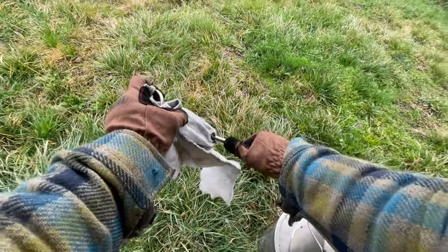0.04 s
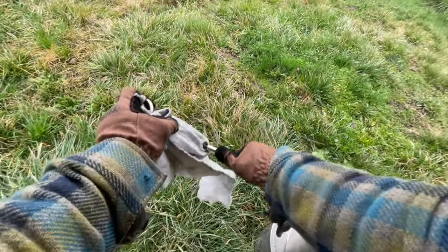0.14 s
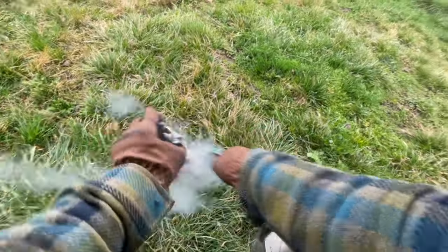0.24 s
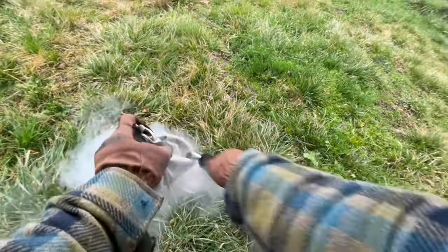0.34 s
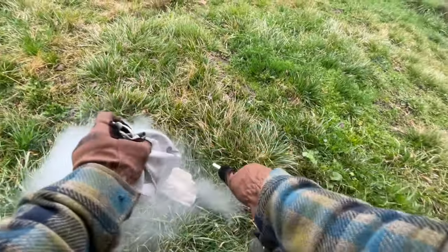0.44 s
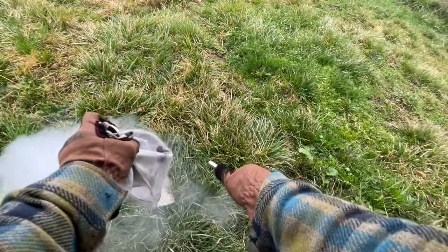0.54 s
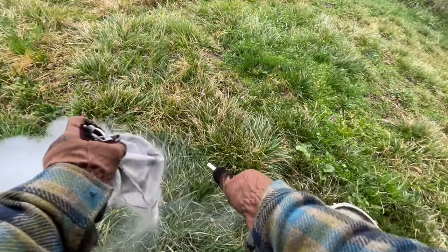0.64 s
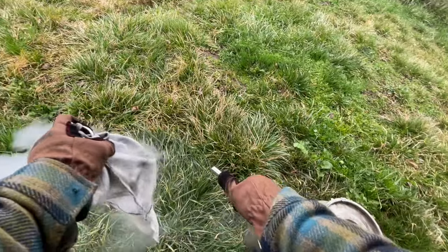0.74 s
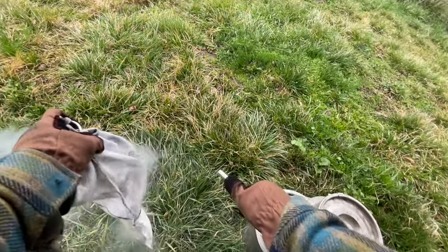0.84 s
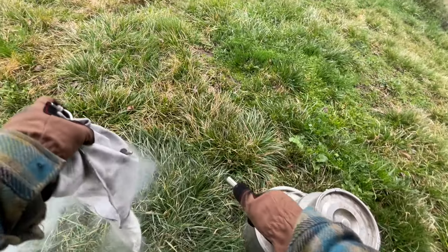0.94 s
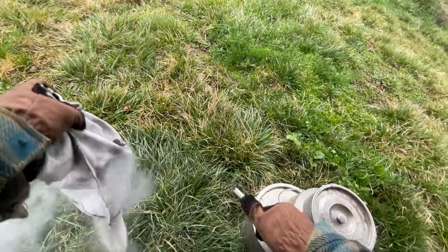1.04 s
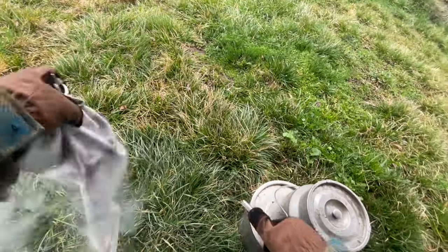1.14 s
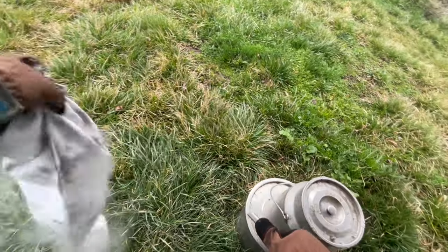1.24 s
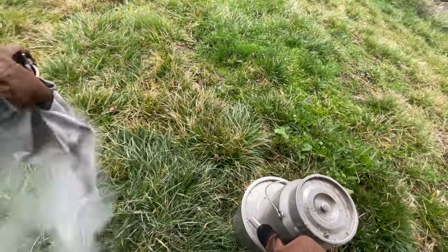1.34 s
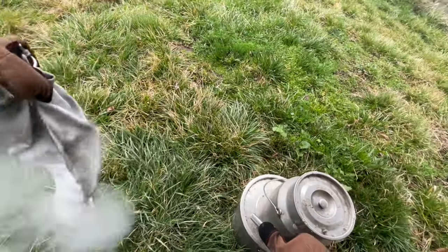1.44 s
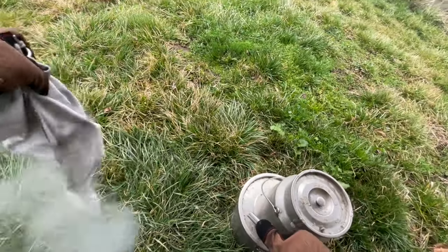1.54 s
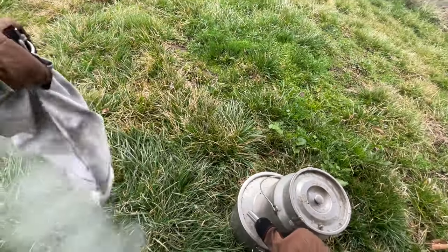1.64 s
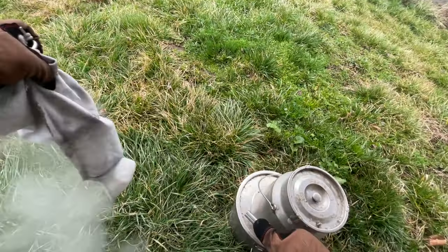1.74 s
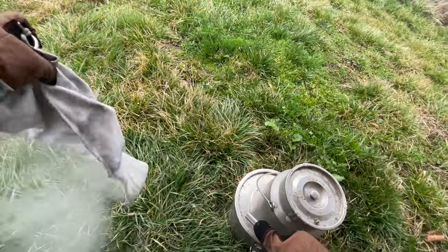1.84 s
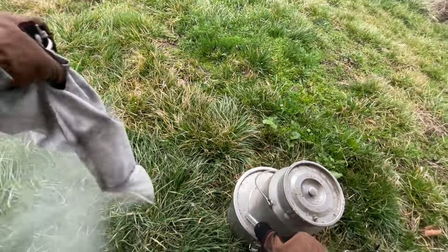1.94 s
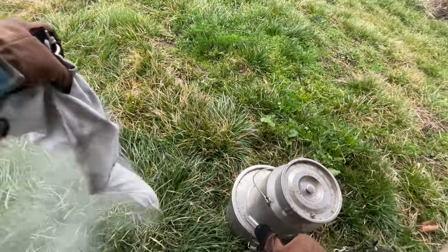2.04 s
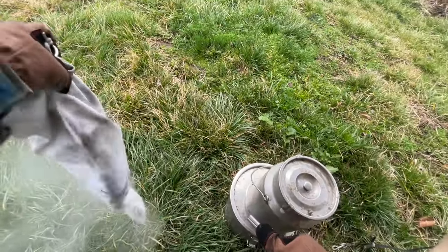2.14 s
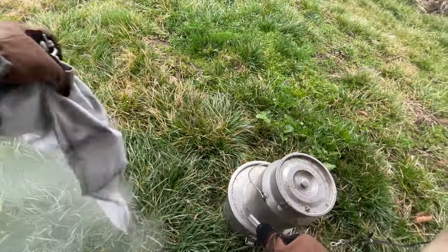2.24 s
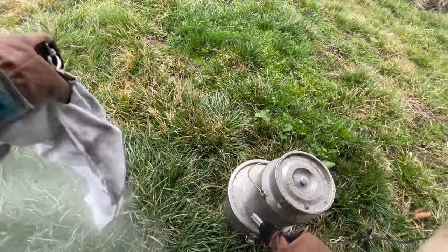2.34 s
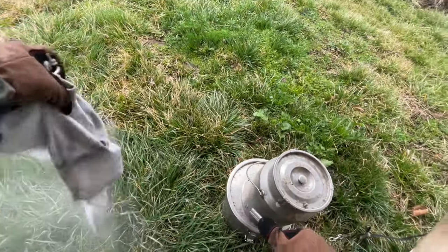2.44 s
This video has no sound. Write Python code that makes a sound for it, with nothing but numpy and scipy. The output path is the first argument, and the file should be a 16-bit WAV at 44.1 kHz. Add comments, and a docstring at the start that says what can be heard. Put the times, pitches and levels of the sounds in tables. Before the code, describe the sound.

A hard, explosive bang from a small iron pressure vessel at about 0.22 seconds, preceded by a split-second metal lid rasp, with a plunging puff, short outdoor tail and low throb fading by 0.8. Faint clacks surround it; a dull double knock lands at 0.75. From 1.15, soft cloth flaps, jingles and clacks grow busier over gentle steam, with low microphone gusts from 2.03 to 2.4.

```python
"""Iron pressure vessel fired into a sack

Outdoors, a small iron vessel is levered open: lid modes rasp for 20 ms, then a noise crack and a
falling sine make the bang and puff, with a short noise tail and a low throb that dies away.
Steam is soft coloured noise. The cloth sack flaps, slides and crinkles; metal clacks, jingles and
rings in bursts and decaying sines, with faint scatter from the grass.
Two microphone ports also take gusts, low buffeting and still air.
"""
import sys
import numpy as np
from scipy import signal
from scipy.fft import rfft, irfft
from scipy.io import wavfile
from scipy.ndimage import uniform_filter1d, minimum_filter1d

SR = 44100
rng = np.random.default_rng(int(sys.argv[2]) if len(sys.argv) > 2 else 0)


def wrap_up_sound(samples):
    """Save the sound to the file named by the first command line argument, as 16-bit audio."""
    columns = np.atleast_2d(samples).T
    # keep every value between -1 and 1, then stretch to whole-number steps
    tamed = np.clip(columns, -1, 1)
    steps = np.round(tamed * 32767).astype(np.int16)
    wavfile.write(sys.argv[1], SR, steps)


N = 110250
T, HZ = np.arange(N) / SR, np.fft.rfftfreq(N, 1 / SR)
SHORT_T, SHORT_HZ = np.arange(8192) / SR, np.fft.rfftfreq(8192, 1 / SR)  # for brief sounds

# Blast: spectra of the crack and of the outdoor tail: pitch_hz, level_db
CRACK_SPECTRUM = [(100, -1), (600, 7.5), (1500, -1), (4000, -11), (8000, -11), (16000, -26.5)]
TAIL_SPECTRUM = [(30, -4), (130, -2.5), (450, 0), (800, -10), (1300, -16), (3300, -24), (4500, -30),
                 (9000, -31.5), (16000, -45)]
OPEN_S = 0.218  # the lid is off
CRACK_DB, CRACK_S = -3, 0.0015
TAIL_DB, TAIL_T60_S, FAR_DB, FAR_T60_S = -16, 0.07, -43.5, 0.27
PUFF_DROP_HZ, PUFF_END_HZ, PUFF_SAG_S, PUFF_DELAY_S = 620, 4, 0.0037, 0.0008
PUFF_DB, PUFF_HOLD_S, PUFF_T60_S = -5.5, 0.0075, 0.051
PUSH_DB, PUSH_T60_S = -14.5, 0.16  # slow push of the gas that lingers on the left, re the puff

# Modes of the slipping lid: pitch_hz, left_db, right_db
LID_MODES = [(470, -14, -8), (600, -2, -15), (1040, -8, -5), (1380, -24, -4), (1490, -24, -3),
             (1905, -32, -6), (2160, -40, -6), (2420, -34, -12), (3385, -21, -9), (4095, -36, -13),
             (4285, -33, -9), (4840, -12, -2), (5525, -9, -7), (5690, -7, -8), (5880, -8, -7),
             (6230, -11, -6), (6870, -16, -13), (7300, -16, -28)]
# Spectrum of the lid's rasp: pitch_hz, level_db
RASP_SPECTRUM = [(60, 2), (400, 6), (900, 1.5), (2800, -8), (6500, -13.5), (7600, -19), (8300, -39.5),
                 (16000, -50.5)]
SLIP_S, FULL_S, SLIP_RISE_DB, SLIP_T60_S = 0.1972, 0.2104, 34, 0.011
LID_RING_DB, RASP_DB, RASP_LEFT_DB, LID_WIDTH_HZ = -9.5, -17.5, -3.5, 27

# Level curve of the low throb: time_s, level_db
THROB_LEVEL = [(.23, -57), (.29, -44), (.39, -35.5), (.45, -37.5), (.495, -49.5), (.57, -39), (.65, -45.5),
               (.78, -58), (1.1, -73.5)]
THROB_HZ, THROB_SAG_HZ_PER_S = 51, 4.8
THROB_RIGHT_DB, THROB_THIRD_DB = -11.5, -26.5  # right port; third harmonic

# Clacks of the lever: start_s, level_db, treble_db
CLACKS = [(0.014, -57, -50), (.073, -63, 13), (0.155, -58.5, 1), (0.301, -53.5, -1), (0.36, -46.5, 22),
          (0.366, -50.5, 12), (.468, -61, 20), (0.64, -59, 2), (1.2027, -52, 13.5), (1.2789, -38, -8),
          (1.35, -53, 0), (1.4684, -49.5, 3), (1.574, -57, 3.5), (1.61, -51, -19), (1.642, -52.5, -8),
          (1.699, -53, -7), (1.9762, -34, -8.5), (1.983, -49, 2), (2.115, -53.5, -17), (2.1499, -36, -0.5),
          (2.249, -42.5, -3), (2.329, -42, 6), (2.346, -35.5, 2.5), (2.353, -46, -9)]
# Spectrum of a clack: pitch_hz, level_db
CLACK_SPECTRUM = [(200, -9), (550, -4), (1000, -11), (2100, -6.5), (3200, -2), (4000, -10.5), (5000, -9),
                  (6500, -9.5), (8000, -19), (12000, -14.5), (16000, -28)]
CLACK_T60_S, CLACK_TAIL_DB, CLACK_TAIL_T60_S = 0.0032, -15.5, 0.034

# Knocks as the vessel is set down on the grass: start_s, level_db
SET_DOWN = [(0.744, -46.5), (.751, -50.5)]
# Spectrum of the vessel's frame: pitch_hz, level_db
FRAME_SPECTRUM = [(170, 13), (330, -1), (900, -6), (2200, 0.5), (3000, -12.5), (4500, -18.5), (9000, -37)]

# Jingles of small fittings: start_s, length_s, level_db
JINGLES = [(0.584, 0.023, -61), (1.107, 0.022, -61.5), (1.2, 0.049, -56), (1.294, 0.026, -49.5),
           (1.463, 0.016, -53), (1.484, 0.013, -46.5), (1.592, 0.018, -55), (1.65, 0.023, -59),
           (1.703, 0.018, -59.5), (1.755, 0.032, -59.5), (1.83, 0.016, -51.5), (1.854, 0.02, -50),
           (1.917, 0.034, -57), (1.971, 0.027, -55.5), (2.014, 0.012, -54.5), (2.109, 0.017, -56.5),
           (2.149, 0.0062, -48), (2.166, 0.032, -51.5), (2.242, 0.0134, -47.5), (2.323, 0.035, -51.5),
           (2.415, 0.0041, -50), (2.457, 0.012, -58)]
# Typical modes of the fittings: pitch_hz, level_db, t60_s
FITTING_MODES = [(6882, 3.5, 0.038), (9350, -5, 0.033), (10246, 1.5, 0.017), (11550, 0, 0.0083),
                 (12500, -2, 0.0077), (13100, -4, 0.01)]
# Spectrum of their contacts: pitch_hz, level_db
TICK_SPECTRUM = [(400, -53), (1500, 8), (3300, 8), (6500, 12.5), (8000, -30), (10500, 5), (13000, -44),
                 (16000, -11)]
TICK_DB, TICKS_PER_S, MODE_SPREAD_DB = -5, 700, 3

# Thin rings and squeaks: start_s, pitch_hz, level_db, t60_s
RINGS = [(.391, 10230, -56.5, 0.24), (.395, 8520, -65, 0.37), (.532, 2850, -67.5, .2),
         (.551, 3230, -62, 0.11)]

# Flaps of the sack: start_s, level_db
FLAPS = [(0.119, -54.5), (1.149, -47), (1.203, -46.5), (1.229, -42.5), (1.279, -45), (1.312, -45),
         (1.357, -45.5), (1.468, -47.5), (1.49, -48), (1.702, -44), (1.766, -37), (1.782, -43), (1.86, -42),
         (1.932, -41.5), (1.979, -40.5), (2.11, -44.5), (2.152, -43), (2.179, -39.5), (2.229, -42.5),
         (2.248, -46.5), (2.328, -39.5), (2.349, -47), (2.365, -47.5)]
# Spectrum of a typical flap: pitch_hz, level_db
FLAP_SPECTRUM = [(40, -18), (120, -7), (230, -6.5), (340, -1), (430, -6.5), (540, 3), (700, -17),
                 (1300, -16), (2500, -26.5), (8000, -49)]
FLAP_RISE_S, FLAP_T60_S = 0.0018, 0.061
# dB of extra upper range per dB of strength above a typical flap
FLAP_BRIGHTEN, FLAP_TYPICAL_DB = 0.94, -43

# Resonances of cloth sliding on cloth: pitch_hz, width_hz
SWISH_PEAKS = [(1390, 200), (2280, 180)]
# Level curve of the sliding: time_s, level_db
SWISH_LEVEL = [(1.95, -70), (1.99, -54.5), (2.17, -57), (2.3, -68)]

# Spectrum of the steam: pitch_hz, level_db
STEAM_SPECTRUM = [(200, -1), (350, 3.5), (560, 4.5), (800, -2.5), (1350, -4.5), (1700, -9), (2300, -8),
                  (4000, -20), (7000, -19.5), (16000, -42.5)]
# Level curve of the steam: time_s, level_db
STEAM_LEVEL = [(0, -60.5), (.19, -58.5), (.35, -63.5), (.65, -63), (.85, -68.5), (1.08, -69), (1.22, -62),
               (1.38, -55.5), (1.56, -58), (1.74, -57.5), (1.79, -52.5), (2.01, -52), (2.17, -49),
               (2.29, -54), (2.37, -50), (2.5, -54)]

# Gusts on the microphone: start_s, level_db
GUSTS = [(2.035, -41), (2.075, -34.5), (2.105, -33.5), (2.18, -30.5), (2.232, -33), (2.295, -41.5),
         (2.399, -42)]
# Spectrum of a gust: pitch_hz, level_db
GUST_SPECTRUM = [(25, -1), (90, 3), (250, -7.5), (900, -39)]
GUST_S, GUST_RIGHT_DB = 0.01, -2.5

# Spectrum of the low buffeting of the microphone: pitch_hz, level_db
RUMBLE_SPECTRUM = [(15, -15.5), (45, 3), (85, 2.5), (300, -14.5), (1000, -49)]
# Level curve of the buffeting: time_s, level_db
RUMBLE_LEVEL = [(0, -62.5), (.5, -52.5), (1, -61.5), (1.3, -57.5), (1.95, -62), (2.13, -47.5), (2.5, -56.5)]

# Spectrum of the outdoor air: pitch_hz, level_db
AIR_SPECTRUM = [(30, -2), (90, -6.5), (430, -16), (720, -8), (1400, -24), (3000, -33.5), (6000, -21.5),
                (8000, -38.5), (12000, -30.5), (16000, -52)]
AIR_DB = -66

# Response of the microphone: pitch_hz, level_db
MIC_RESPONSE = [(20, 0), (12800, 0), (14200, -8), (16000, -7.5)]
LAG_S, LIKENESS = 0.0002802, 0.64  # delay to the right port; shared amplitude of noise
PORT_TURN_RAD, PORT_HZ, PORT_WIDTH_HZ = 0.72, 659.6, 140  # extra phase lag of the right port
HANDS_LEFT_DB, GROUND_DB, EDGE_HZ = 4, -11, 16100


def blast():
    """A crack, a puff whose pitch drops as the steam expands, and a short outdoor tail."""
    t = np.maximum(T - OPEN_S - PUFF_DELAY_S, 0)
    hz = PUFF_END_HZ + PUFF_DROP_HZ * np.exp(-t / PUFF_SAG_S)
    angle = 2 * np.pi * np.cumsum(hz * (t > 0)) / SR
    late = np.maximum(t - PUFF_HOLD_S, 0)
    fade = fall(late, PUFF_T60_S)
    left = np.maximum(fade, amp(PUSH_DB) * fall(late, PUSH_T60_S))
    puff = np.sin(angle) * np.array([left, fade ** 2])  # the right dies twice as fast

    crack = amp(CRACK_DB) * noise(CRACK_SPECTRUM) * np.exp(-abs(T - OPEN_S) / CRACK_S)
    near = amp(TAIL_DB) * fall(T - OPEN_S, TAIL_T60_S)
    far = amp(FAR_DB) * fall(T - OPEN_S, FAR_T60_S)
    tail = noise(TAIL_SPECTRUM) * (near + far)
    return amp(PUFF_DB) * puff + crack + tail * flutter(2, 0.004)


def lid():
    """The lid rasps off its seat: unsteady modes and noise swell, then stop once it is free."""
    ring = 0
    for hz, left_db, right_db in LID_MODES:
        wander = uniform_filter1d(rng.standard_normal(N), size=45)
        turns = hz * T + np.cumsum(wander) * np.sqrt(LID_WIDTH_HZ / SR / (2 * np.pi))
        port_turns = turns - np.array([[0], [hz * LAG_S]])
        ring = ring + amp([[left_db], [right_db]]) * np.sin(2 * np.pi * port_turns)
    rasp = noise(RASP_SPECTRUM) * flutter(3, 0.001) * amp([[RASP_LEFT_DB], [0]])

    to_go = np.clip((FULL_S - T) / (FULL_S - SLIP_S), 0, 1)
    swell = amp(-SLIP_RISE_DB * to_go) * np.clip((T - SLIP_S) / 0.0013, 0, 1)
    stop = fall(np.maximum(T - OPEN_S, 0), SLIP_T60_S)
    return (amp(LID_RING_DB) * unit(ring) + amp(RASP_DB) * rasp) * swell * stop


def throb():
    """A deep tone of sinking pitch and a faint third harmonic rise and dip, then die away."""
    hz = THROB_HZ - THROB_SAG_HZ_PER_S * (T - OPEN_S)
    angle = 2 * np.pi * np.cumsum(hz) / SR
    tone = unit(np.sin(angle) + amp(THROB_THIRD_DB) * np.sin(3 * angle))
    return level(THROB_LEVEL) * tone * amp([[0], [THROB_RIGHT_DB]])


def clacks():
    """Dry knocks of hand-held metal: short noise bursts, some dull and some bright."""
    out = np.zeros(N)
    tail = amp(CLACK_TAIL_DB) * fall(SHORT_T, CLACK_TAIL_T60_S)
    envelope = np.minimum(SHORT_T / 0.00042, 1) * (fall(SHORT_T, CLACK_T60_S) + tail)
    for start_s, db, treble_db in CLACKS:
        treble = colour([(3000, 0), (9000, treble_db)], SHORT_HZ)
        knock = burst(envelope, colour(CLACK_SPECTRUM, SHORT_HZ) * treble)
        add(out, start_s, amp(db) * np.sqrt(0.0032 * SR) * knock)  # energy as over 3.2 ms
    return out


def set_down(t60=0.018):
    """A dull double knock of the vessel's frame, as two decaying noise bursts."""
    out = np.zeros(N)
    for start_s, db in SET_DOWN:
        knock = burst(fall(SHORT_T, t60), colour(FRAME_SPECTRUM, SHORT_HZ))
        add(out, start_s, amp(db) * np.sqrt(0.0057 * SR) * knock)
    return out


def jingles():
    """Clusters of tiny contacts ring the small fittings, whose modes vary each time."""
    out, t = np.zeros(N), SHORT_T
    for start_s, length_s, db in JINGLES:
        contacts = 0.059 + (rng.random(len(t)) < TICKS_PER_S / SR)  # sparse, over a faint scrape
        hits = rng.standard_normal(len(t)) * contacts * (t < length_s)
        modes = 0
        for hz, mode_db, t60 in FITTING_MODES:
            gain = amp(mode_db + MODE_SPREAD_DB * rng.standard_normal())
            decay = fall(t, t60 * 2 ** rng.uniform(-1, 0.5))
            mode_hz = hz * (1 + 0.011 * rng.standard_normal())
            modes = modes + gain * decay * np.sin(2 * np.pi * mode_hz * t)
        ring = signal.fftconvolve(hits, modes)[:len(t)]
        tick = burst(abs(hits), colour(TICK_SPECTRUM, SHORT_HZ))
        jingle = ring / np.linalg.norm(ring) + amp(TICK_DB) * tick
        add(out, start_s, amp(db) * np.sqrt(length_s * SR / 2) * jingle)
    return out


def rings(rise_s=0.0079):
    """Thin rings and squeaks of loose metal: single decaying, fluttering sines."""
    out = 0
    for start_s, hz, db, t60 in RINGS:
        envelope = np.clip((T - start_s) / rise_s, 0, 1) * fall(T - start_s, t60)
        out = out + amp(db) * envelope * flutter(3.5, 0.006) * np.sin(2 * np.pi * hz * T)
    return out


def sack():
    """Soft, hollow flaps of the shaken cloth as noise bursts; harder ones are brighter."""
    out = np.zeros(N)
    envelope = np.minimum(SHORT_T / FLAP_RISE_S, 1) * fall(SHORT_T, FLAP_T60_S)
    for start_s, db in FLAPS:
        bright_db = FLAP_BRIGHTEN * (db - FLAP_TYPICAL_DB)
        bright = colour([(550, 0), (1200, bright_db)], SHORT_HZ)
        flap = burst(envelope, colour(FLAP_SPECTRUM, SHORT_HZ) * bright)
        add(out, start_s, amp(db) * np.sqrt(0.0081 * SR) * flap)
    return out


def swish():
    """The sack slides over itself: grainy friction through narrow resonances."""
    gain = sum(1 / (1 + 2j * (HZ - hz) / width_hz) for hz, width_hz in SWISH_PEAKS)
    friction = rng.standard_normal(N) * flutter(6, 0.006)
    sliding = (T > SWISH_LEVEL[0][0]) * (T < SWISH_LEVEL[-1][0])
    return unit(irfft(rfft(friction) * gain, N)) * level(SWISH_LEVEL) * sliding


def crinkle(low_hz=1900, high_hz=6000, per_s=40, t60=0.005, db=-18, count=8):
    """Clumps of tiny snaps in the cloth, each fold with its own pitch, follow the steam level."""
    out = 0
    for hz in np.geomspace(low_hz, high_hz, count):
        snaps = (rng.random(N) < per_s / SR) * flutter(5.5, 0.03)
        fold = fall(SHORT_T, t60) * np.sin(2 * np.pi * hz * SHORT_T)
        out = out + signal.fftconvolve(snaps, fold)[:N]
    return amp(db) * unit(out) * level(STEAM_LEVEL)


def steam():
    """A soft, uneven rush of coloured noise."""
    return noise(STEAM_SPECTRUM) * level(STEAM_LEVEL) * flutter(3, 0.013)


def ground(x, t60=0.11):
    """Adds faint, quick scatter from grass and arms: decaying random echoes after 3 ms."""
    taps = rng.standard_normal((2, len(SHORT_T))) * fall(SHORT_T - 0.003, t60)
    taps = taps / np.linalg.norm(taps[0])
    return x + amp(GROUND_DB) * signal.fftconvolve(x, taps, axes=1)[:, :N]


def gusts():
    """Lumps of moving air push one microphone port and pull the other."""
    out = np.zeros(N)
    envelope = SHORT_T / GUST_S * np.exp(-SHORT_T / GUST_S)
    for start_s, db in GUSTS:
        gust = burst(envelope, colour(GUST_SPECTRUM, SHORT_HZ))
        add(out, start_s, amp(db) * np.sqrt(2 * GUST_S * SR) * gust)
    return np.array([out, -amp(GUST_RIGHT_DB) * out])


def buffeting():
    """Low noise of air moving at the microphone."""
    return noise(RUMBLE_SPECTRUM) * level(RUMBLE_LEVEL)


def outdoor_air():
    """Steady, faint noise of the still outdoor air."""
    return amp(AIR_DB) * noise(AIR_SPECTRUM)


def ports(x, left_db=0):
    """Two microphone ports, left up and right down by left_db; the left hears the sound first."""
    turn = PORT_TURN_RAD * np.exp(-((HZ - PORT_HZ) / PORT_WIDTH_HZ) ** 2)
    right = irfft(rfft(x) * np.exp(-2j * np.pi * HZ * LAG_S - 1j * turn), N)
    return np.array([x * amp(left_db), right / amp(left_db)])


def noise(points):
    """Coloured noise of rms 1, partly shared by both ports."""
    shared = LIKENESS * ports(rng.standard_normal(N))
    white = shared + np.sqrt(1 - LIKENESS ** 2) * rng.standard_normal((2, N))
    return unit(irfft(rfft(white) * colour(points), N))


def burst(envelope, gain, size=8192):
    """A short noise burst with an even spectrum, passed through a causal colour; energy 1."""
    z = rfft(envelope * rng.standard_normal(size))
    z = z / np.sqrt(uniform_filter1d(abs(z) ** 2, size=129) + 1e-12)
    # minimum phase keeps the colour from sounding ahead of the onset
    log_gain = np.log(np.r_[gain, gain[-2:0:-1]] + 1e-5)
    causal = np.exp(np.conj(signal.hilbert(log_gain)))[:len(z)]
    x = irfft(z * causal) * np.cos(np.linspace(0, np.pi / 2, size)) ** 2
    return x / np.linalg.norm(x)


def flutter(db, seconds):
    """An uneven gain of rms 1 that changes about once in the given time."""
    drift = uniform_filter1d(rng.standard_normal(N), max(int(seconds * SR), 1))
    return unit(amp(db * unit(drift)))


def amp(db):
    """Decibels to gain."""
    return 10 ** (np.asarray(db) / 20)


def unit(x):
    """Scales to rms 1."""
    return x / np.sqrt(np.mean(x ** 2) + 1e-20)


def colour(points, hz=HZ):
    """Gain of a spectrum at each frequency, in dB over log frequency."""
    f, db = np.transpose(points)
    return amp(np.interp(np.log(hz + 1), np.log(f), db))


def level(points):
    """Gain over time from a level curve."""
    return amp(np.interp(T, *np.transpose(points)))


def fall(t, t60):
    """Silence, then an exponential decay by 60 dB in t60 seconds from t = 0."""
    return (t >= 0) * np.exp(-np.log(1000) * np.maximum(t, 0) / t60)


def add(mix, start_s, sound):
    """Mixes a sound in at a time."""
    part = mix[max(round(start_s * SR), 0):][:len(sound)]
    part += sound[:len(part)]


def scene():
    """The bang and the handling in the steam, over the outdoor background."""
    metal = ports(clacks() + jingles() + rings(), HANDS_LEFT_DB)
    cloth = ports(sack() + swish() + crinkle())
    bang = blast() + lid() + throb()
    background = steam() + gusts() + buffeting() + outdoor_air()
    return bang + ground(metal + cloth) + set_down() + background


def record(dry):
    """A quick full-scale limiter, microphone colour and band limit."""
    gain = 1 / np.maximum(abs(dry).max(0), 1)
    limited = dry * uniform_filter1d(minimum_filter1d(gain, size=45), size=45)  # about 1 ms
    coloured = irfft(rfft(limited) * colour(MIC_RESPONSE), N)
    low_pass = signal.firwin(511, EDGE_HZ, window=("kaiser", 9), fs=SR)
    return signal.oaconvolve(coloured, low_pass[None], "same")


dry = scene()
out = record(dry)
wrap_up_sound(out)
```